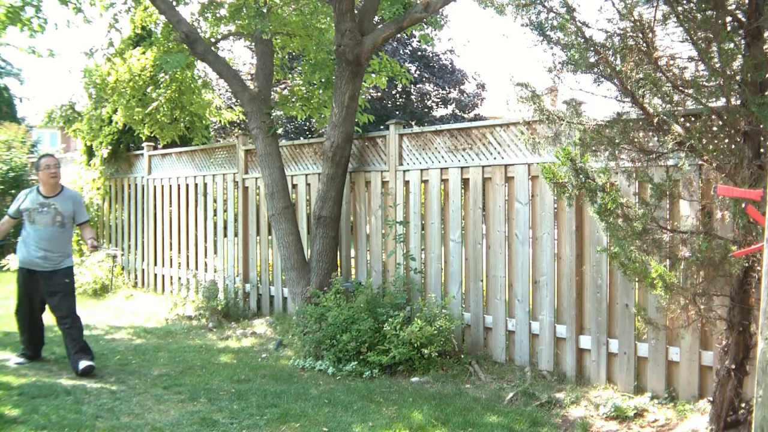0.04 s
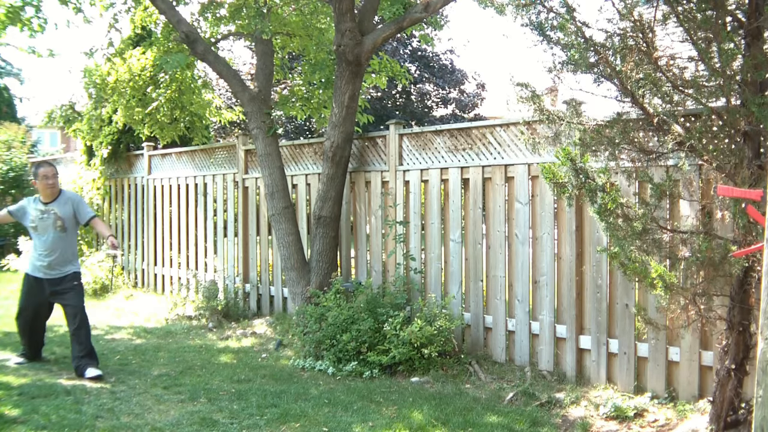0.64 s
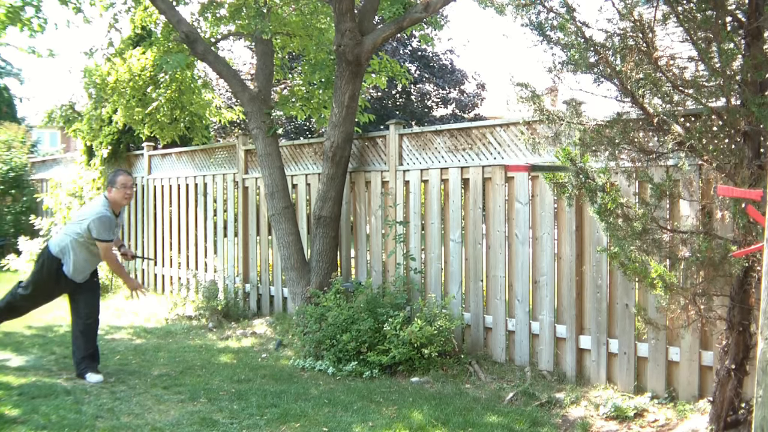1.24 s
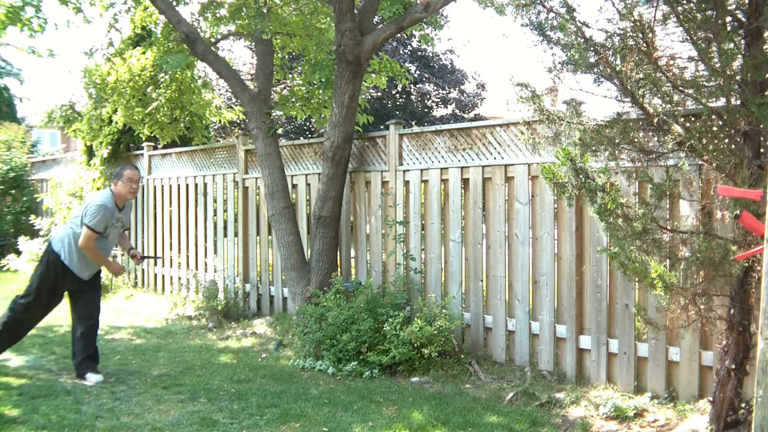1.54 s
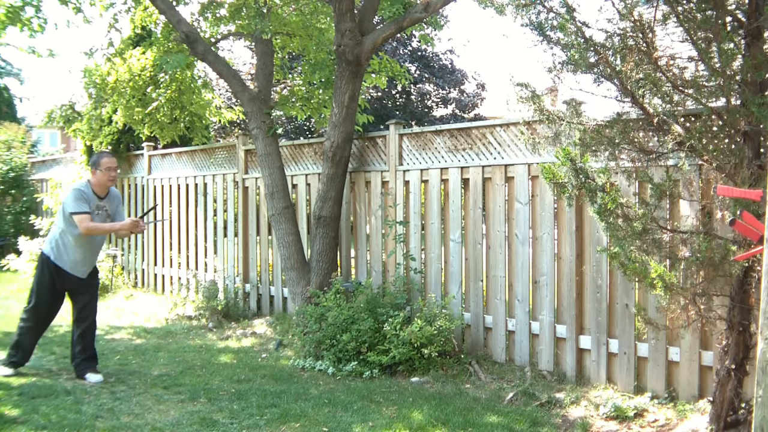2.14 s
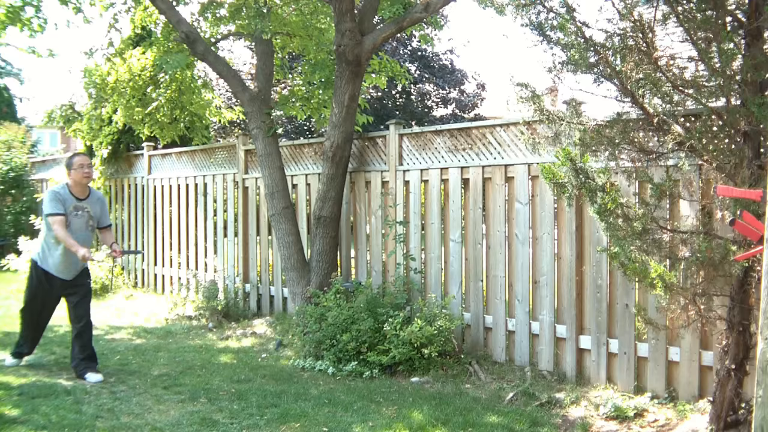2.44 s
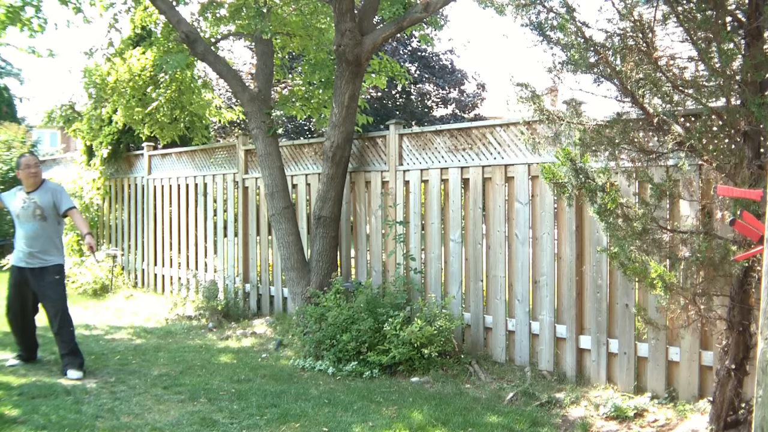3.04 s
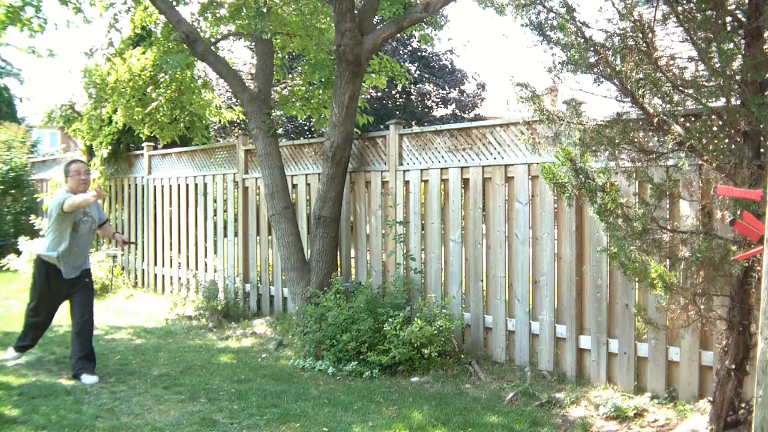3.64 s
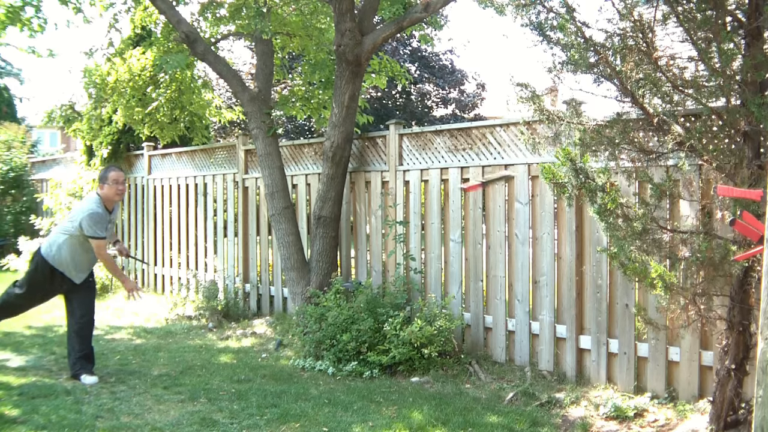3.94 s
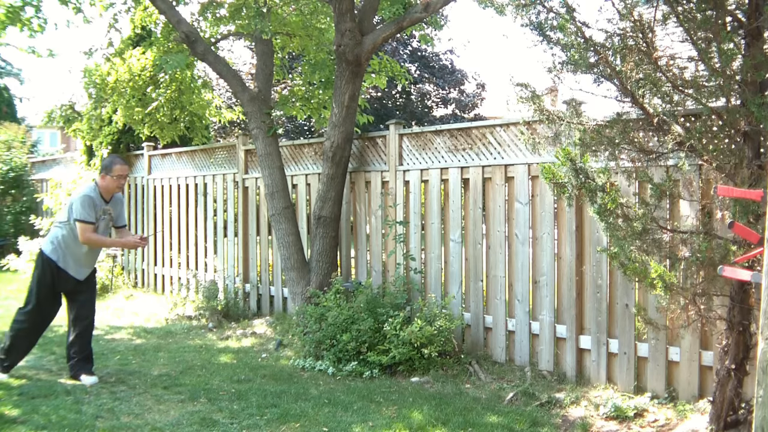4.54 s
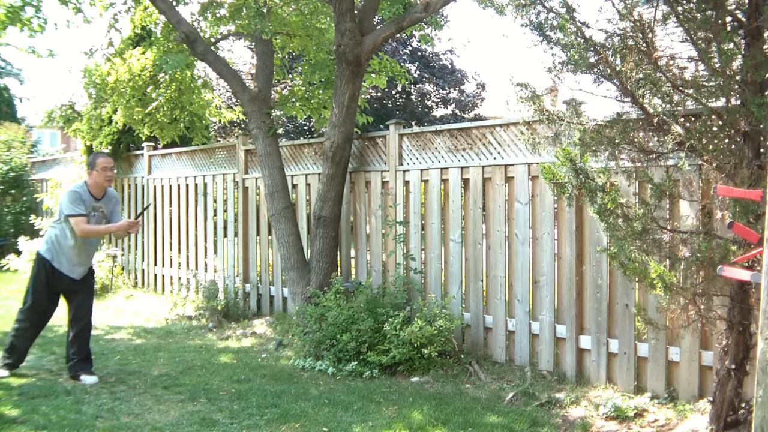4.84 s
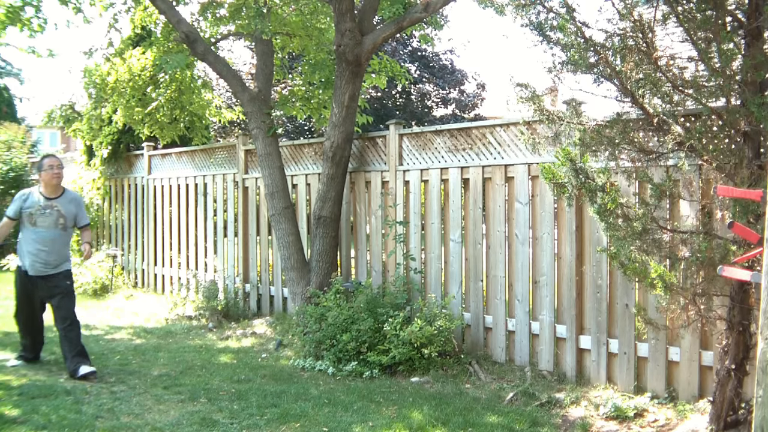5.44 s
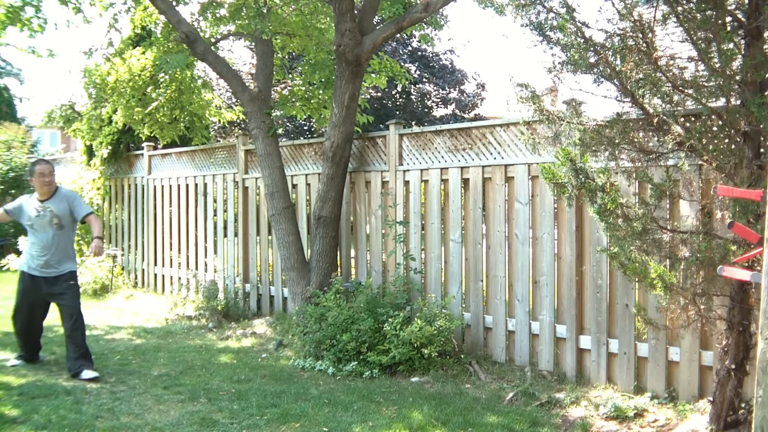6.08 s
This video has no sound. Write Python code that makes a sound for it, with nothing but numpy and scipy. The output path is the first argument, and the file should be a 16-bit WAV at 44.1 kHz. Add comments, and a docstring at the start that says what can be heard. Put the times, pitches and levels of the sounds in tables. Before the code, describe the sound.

In a quiet backyard, a thrown knife strikes a wooden target close to the microphone with a sharp crack, a solid thud and a brief buzz of the blade. A few seconds later a second knife lands with a duller thud. It works loose and falls onto the first with a loud, bright clang and a few smaller clinks. Short echoes come off the fence, over faint distant traffic.

```python
"""Knife throwing in a backyard

Two steel knives bite into a wooden target near a camera: the fibres crack, the board thuds, the
blade buzzes. The second works loose and drops onto its neighbour with a clang. Hard blows overload
the microphone; fence and houses throw them back over a faint suburban hum."""
import sys
import numpy as np
from scipy import signal
from scipy.fft import rfft, irfft
from scipy.io import wavfile

SR = 44100
rng = np.random.default_rng(int(sys.argv[2]) if len(sys.argv) > 2 else 0)


def waveform_to_disk(signal):
    """Save audio, clipped to [-1, 1], as 16-bit WAV at the path in sys.argv[1]."""
    frames = np.transpose(np.atleast_2d(signal))
    scaled = np.clip(frames, -1, 1) * 32767
    samples = np.round(scaled).astype(np.int16)
    wavfile.write(sys.argv[1], SR, samples)


N = 278271
T = np.arange(SR) / SR  # time axis of one blow, 1 s
HZ = np.fft.rfftfreq(SR, 1 / SR)  # its frequency axis

# coherence of a blow at the two microphone ports: f/Hz, left-right likeness/0..1
HIT_LIKENESS = [(400, 0.97), (1000, 0.98), (2400, 0.89), (5000, 0.67), (10000, 0.21)]


def throws(sink_s=0.0038, cushion_s=0.0091):
    """The point bites, then the board takes the weight; a deeper bite builds the thud more softly."""
    # landings: t/s, crack level/dB, thud level/dB, main resonance of the spot/Hz
    landings = [(1.591, -0.5, 5.5, 690), (4.3191, -12, 8, 887)]
    out = np.zeros((2, N))
    for at_s, crack_db, thud_db, main_hz in landings:
        add(out, at_s, bite(crack_db))
        add(out, at_s + sink_s, thud(thud_db, main_hz, rise_s=cushion_s * gain_of(crack_db)))
    return out


def bite(db, crack_t60_s=0.18, buzz_db=-15, buzz_t60_s=0.43, rise_s=0.0015):
    """Fibres split with a bright crack as the point enters; the blade buzzes in the cut."""
    # resonances of a blade held by its point: f/Hz, width/Hz, level/dB
    stuck_modes = [(4000, 350, -1), (5400, 220, -2), (5730, 200, -2), (7150, 300, -4), (8850, 170, -1),
                   (10610, 150, -4)]
    response = sum(gain_of(level) * resonance(HZ, f, width) for f, width, level in stuck_modes)
    buzz = unit_rms(irfft(rfft(contact_noise()) * response, SR)) * fade(buzz_t60_s)
    crack = contact_noise(tilt_db_oct=-2) * fade(crack_t60_s)
    return gain_of(db) * (crack + gain_of(buzz_db) * buzz) * rise(rise_s)


def thud(db, main_hz, rise_s, main_db=4, knock_db=-3, stand_hz=95, stand_db=-21, stand_t60_s=0.39):
    """Dense board modes shudder, treble dying first, over a pitched knock and the rocking stand."""
    # board spectrum: f/Hz, density/dB
    board_spectrum = [(40, -19), (100, -5), (200, -2), (320, -0.5), (550, -2), (850, -1.5), (1500, -1.5),
                      (2600, -8.5), (4000, -15.5), (7000, -29.5), (14000, -54)]
    # board decay: f/Hz, t60/s
    board_decay = [(100, 0.36), (400, 0.24), (1000, 0.26), (2500, 0.21), (6000, 0.2), (14000, 0.188)]
    # pitched knocking tones of the board: f/Hz, level/dB, t60/s
    knock_tones = [(176, -22.5, 0.66), (230, -28, 0.1394), (497, -34, 0.079), (664.5, -12, 0.29),
                   (775, -21.5, 0.14), (848, -25.5, 0.12), (880, -19.5, 0.17), (1083, -14.5, 0.34),
                   (1264, -27, 0.19), (1466, -22, 0.239), (1684, -4.5, 0.14), (1792, -17.5, 0.31)]
    spectrum = rfft(noise(board_spectrum, HIT_LIKENESS, tilt_db_oct=1.32))
    spectrum *= gain_of(main_db * resonance(HZ, main_hz, width_hz=260))
    centres_hz, t60s = np.transpose(board_decay)
    bands = [curve(np.c_[centres_hz, one], HZ) for one in np.eye(len(centres_hz))]
    shudder = sum(irfft(spectrum * band, SR) * fade(t60) for band, t60 in zip(bands, t60s))
    stand = ring([(stand_hz, stand_db, stand_t60_s)])
    knock = gain_of(knock_db) * ring(knock_tones)
    return gain_of(db) * (shudder + knock + stand) * rise(rise_s)


def contacts():
    """Steel meets steel, in the hand or at the target."""
    # blade contacts: t/s, level/dB, flatness/0..1 (edge..flat), free ring time/s
    touches = [(1.15, -47, 0.35, .035), (3.89, -53, 0.83, .12), (4.8473, -23, 0.35, .014),
               (4.8513, -19.5, .15, 0.018), (4.868, 10.5, 0.16, 0.12), (4.886, 1, 0.085, 0.091),
               (4.924, 0.5, 0.54, 0.13), (5.083, -8.5, 1, .1), (5.186, -22, 0.79, 0.15),
               (5.4972, -48.5, .3, 0.0037)]
    out = np.zeros((2, N))
    for at_s, db, flatness, free_s in touches:
        add(out, at_s, clang(db, flatness, free_s))
    return out


def clang(db, flatness, free_s, rest_db=-14, grate_db=-11, even_click_s=0.079):
    """A click rings a rocking blade until it comes to rest, which chokes most of it; edges grate."""
    # ringing steel tones, with a high overload tone at 13.4 kHz:
    # f/Hz, level struck on edge/dB, level struck on flat/dB, t60/s
    clang_tones = [(662, -24, -28, .75), (1351, -27, -34, .65), (2026, -18, -21, .9), (2925, -21, -21, .85),
                   (2978, -25, -23, .85), (4006, -17, -12, .7), (4080, -15, -15, .75), (4312, -19, -24, .6),
                   (4398, -14, -17, .8), (5258, 1, -19, .55), (5358, -8, -21, .4), (5650, -16, -19, .5),
                   (5730, -14, -9, .62), (6675, -21, -25, .45), (6800, -14, -19, .4), (7150, -17, -29, .45),
                   (7251, -5, -27, .36), (8220, -3, -27, .24), (8376, -12, -32, .3), (8730, -22, -32, .4),
                   (8865, -21, -27, .4), (9045, -21, -27, .5), (9927, -28, -36, .5), (10110, -21, -34, .4),
                   (10610, -25, -33, .35), (12000, -24, -38, .3), (12390, -28, -40, .4),
                   (13300, -22, -36, .35), (13400, -22, -40, .3), (14600, -28, -44, .3)]
    hz, edge_db, flat_db, t60_s = np.transpose(clang_tones)
    partials = np.c_[hz, edge_db + flatness * (flat_db - edge_db), t60_s]
    tilt_db_oct = -2 + 1.5 * gain_of(db)  # harder is brighter
    choke = fade(0.121, np.maximum(T - free_s, 0))
    tones = ring(partials, tilt_db_oct, flutter_hz=40, flutter_depth=0.41) * rise(0.0043)
    tones *= choke + gain_of(rest_db) * (1 - choke)
    click_db = 5 * np.log2(even_click_s / free_s) - 15.5 * flatness  # firm, edge-on blows click more
    click = gain_of(click_db) * fade(0.0081)
    grate = (1 - flatness) * gain_of(grate_db) * fade(0.33) * choke
    return gain_of(db) * (tones + (click + grate) * contact_noise())


def contact_noise(tilt_db_oct=0):
    """Bright noise of a hard contact."""
    # crack spectrum: f/Hz, density/dB
    crack_spectrum = [(100, -26), (600, -14.5), (1800, 3.5), (4000, 6.5), (7000, 2), (10000, 2.5),
                      (15000, -11)]
    return noise(crack_spectrum, HIT_LIKENESS, tilt_db_oct)


def yard_echoes(x, swell_s=0.0034):
    """Fence, trees and house walls return smeared echoes, hollower with distance."""
    # reflectors: delay/s, level/dB, smear t60/s
    walls = [(.02, -18.5, 0.71), (.125, -26, 0.3), (.215, -28.5, .42), (0.274, -37, .33)]
    # path over the lawn, low mids lost to the ground and treble to leaves: f/Hz, gain/dB
    lawn_path = [(60, 15), (160, 3.5), (350, -5.5), (550, 2), (850, 6.5), (1300, -1.5), (4000, -8),
                 (7000, -11), (14000, -44)]
    hz, path_db = np.transpose(lawn_path)
    response = np.zeros((2, SR))
    for delay_s, db, t60_s in walls:
        hollowness = 0.12 + 4.3 * delay_s
        smear = noise(np.c_[hz, hollowness * path_db], HIT_LIKENESS, tilt_db_oct=-0.38)
        smear *= fade(t60_s) * rise(swell_s)
        mid_gain = np.sqrt(np.mean(abs(rfft(smear)[:, 500:3000]) ** 2))  # 1 Hz per bin
        add(response, delay_s, gain_of(db) * smear / mid_gain)
    return signal.fftconvolve(x, response, axes=1)[:, :N]


def background(traffic_db=-40, hum_hz=116.7, hum_db=-53):
    """Steady distant traffic, the wavering hum of far machinery and the camera's thin whine."""
    # traffic spectrum: f/Hz, density/dB
    traffic_spectrum = [(12, -44), (20, -9.5), (54, 2.5), (87, -5.5), (124, -3.5), (199, -11), (229, -9),
                        (377, -14), (470, -12), (555, -14.5), (914, -12.5), (3090, -29.5), (9110, -32),
                        (10500, -31.5), (15000, -34)]
    # traffic coherence: f/Hz, left-right likeness/0..1
    traffic_likeness = [(50, .97), (400, 0.94), (1000, 0.88), (2400, 0.62), (5000, 0.25), (12000, 0.1518)]
    # camera tones: f/Hz, rms level/dB
    whine_tones = [(10191, -67.5), (10250, -61.5)]
    t, hz = np.arange(N) / SR, np.fft.rfftfreq(N, 1 / SR)
    traffic = noise(traffic_spectrum, traffic_likeness, size=N)
    hum = unit_rms(irfft(rfft(rng.standard_normal(N)) * resonance(hz, hum_hz, width_hz=7.9), N))
    whine = sum(gain_of(db) * unit_rms(np.sin(2 * np.pi * f * t)) for f, db in whine_tones)
    return gain_of(traffic_db) * traffic + gain_of(hum_db) * hum + whine


def ring(partials, tilt_db_oct=0, flutter_hz=10, flutter_depth=0, pivot_hz=5000, skew_rad=0.33):
    """Decaying tones, each with its own flutter; higher ones reach the ports further out of phase."""
    hz, db, t60_s = np.transpose(partials)
    phase, side = rng.random((2, len(hz)))
    tones = np.exp(np.outer(2j * np.pi * hz - np.log(1000) / t60_s, T))
    for tone, (re, im) in zip(tones, rng.standard_normal((len(hz), 2, 256))):
        tone *= np.interp(T * flutter_hz, np.arange(len(re)), 1 + flutter_depth * (re + 1j * im))
    skew = np.outer([1, -1], skew_rad * hz / pivot_hz * np.sign(side - 0.5))
    ports = np.exp(2j * np.pi * phase + 1j * skew)
    gains = gain_of(db + tilt_db_oct * np.log2(hz / pivot_hz))
    return ((ports * gains) @ tones).real


def noise(spectrum, likeness, tilt_db_oct=0, size=SR):
    """Coloured unit-rms noise, partly coherent at two close microphone ports."""
    hz = np.fft.rfftfreq(size, 1 / SR)
    mid, side = rfft(rng.standard_normal((2, size)))
    same = curve(likeness, hz)
    mid, side = mid * np.sqrt(1 + same), side * np.sqrt(1 - same)
    shape = gain_of(curve(spectrum, hz) + tilt_db_oct * np.log2(np.maximum(hz, 300)))
    return unit_rms(irfft(np.array([mid + side, mid - side]) * shape, size))


def resonance(hz, centre_hz, width_hz):
    """Unit peak; full width at half height."""
    return 1 / (1 + (2 * (hz - centre_hz) / width_hz) ** 2)


def rise(tau_s):
    """Exponential attack."""
    return 1 - np.exp(-T / tau_s)


def fade(t60_s, t=T):
    """Falls 60 dB in t60_s."""
    return np.exp(-np.log(1000) * t / t60_s)


def gain_of(db):
    """Decibels to amplitude."""
    return 10 ** (np.asarray(db) / 20)


def unit_rms(x):
    """Scales to unit rms."""
    return x / np.sqrt(np.mean(x ** 2) + 1e-20)


def curve(points, hz):
    """Interpolates a table over log frequency."""
    f, value = np.transpose(points)
    return np.interp(np.log(hz + 1), np.log(f + 1), value)


def add(mix, at_s, sound):
    """Mixes in a stereo sound."""
    part = mix[:, round(at_s * SR):][:, :sound.shape[1]]
    part += sound[:, :part.shape[1]]


def scene():
    """Blows, their echoes and the still yard."""
    blows = throws() + contacts()
    return blows + yard_echoes(blows) + background()


def record(dry, duck_db=8.5, duck_s=0.087, knee=5, cutoff_hz=15500):
    """Slow gain control ducks after loud blows, too late to stop peaks flattening; then a low-pass."""
    power = np.minimum(dry ** 2, 1).mean(0)
    pole = np.exp(-1 / (duck_s * SR))
    ducked = dry * gain_of(-duck_db * signal.lfilter([1 - pole], [1, -pole], power))
    clipped = ducked / (1 + abs(ducked) ** knee) ** (1 / knee)
    lowpass = signal.firwin(255, cutoff_hz, window=("kaiser", 8), fs=SR)
    return signal.oaconvolve(clipped, lowpass[None], "same")


dry = scene()
out = record(dry)
waveform_to_disk(out)
```